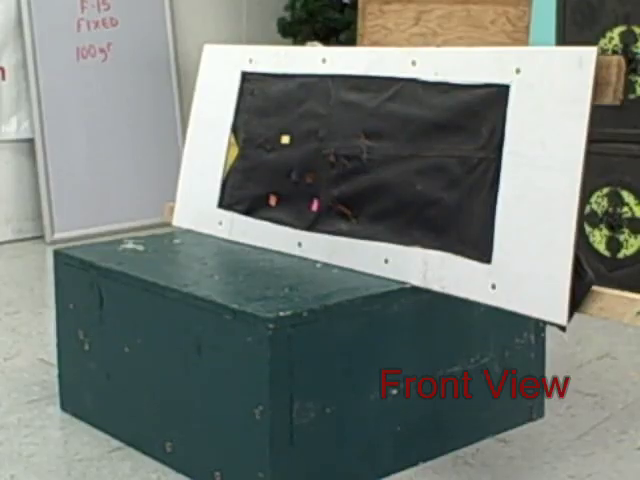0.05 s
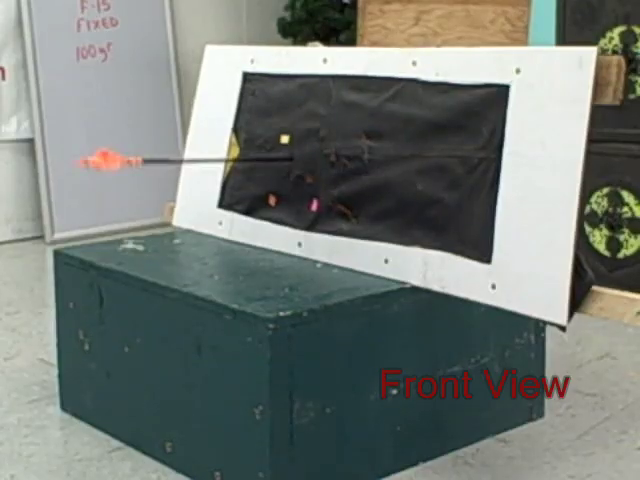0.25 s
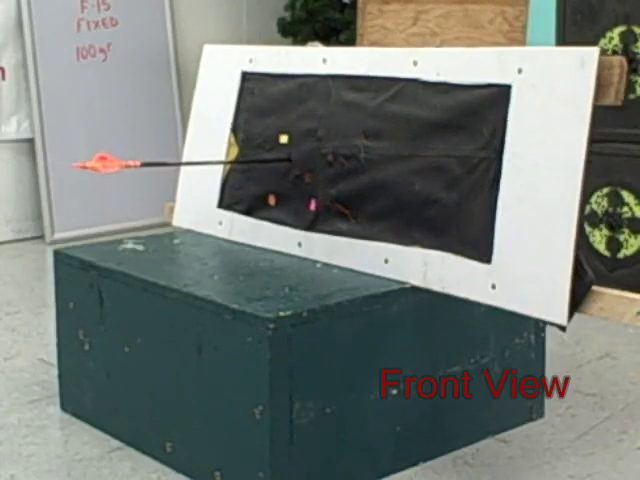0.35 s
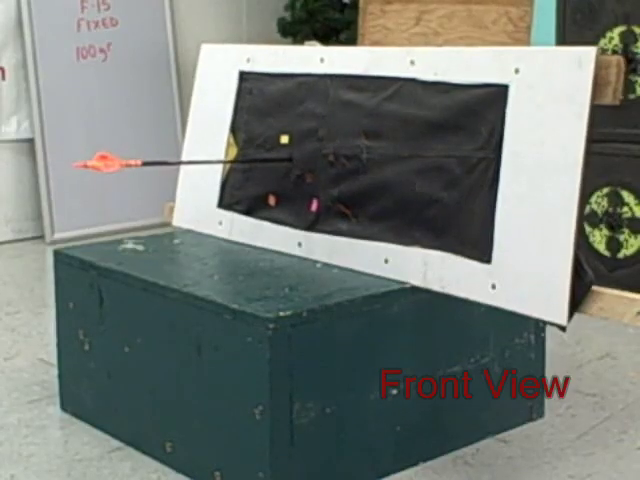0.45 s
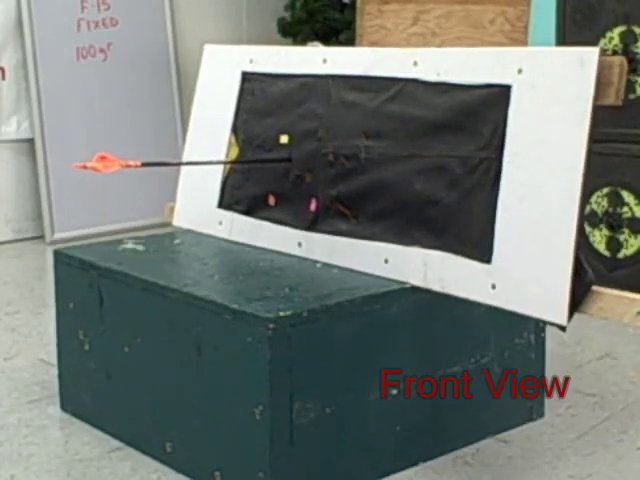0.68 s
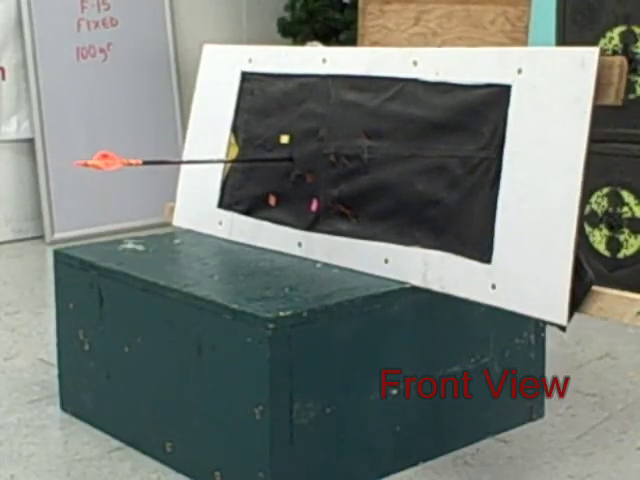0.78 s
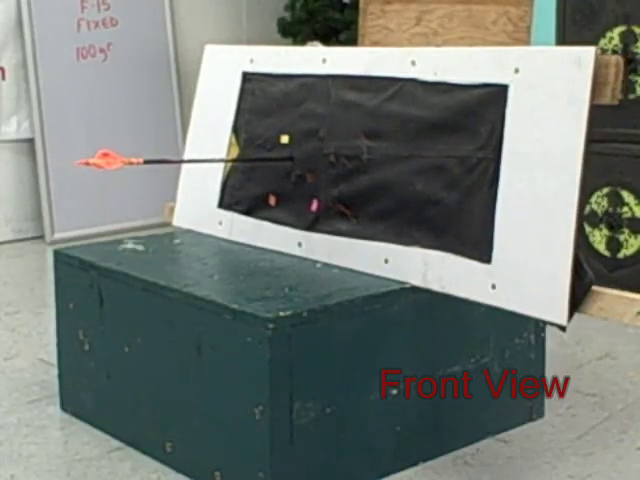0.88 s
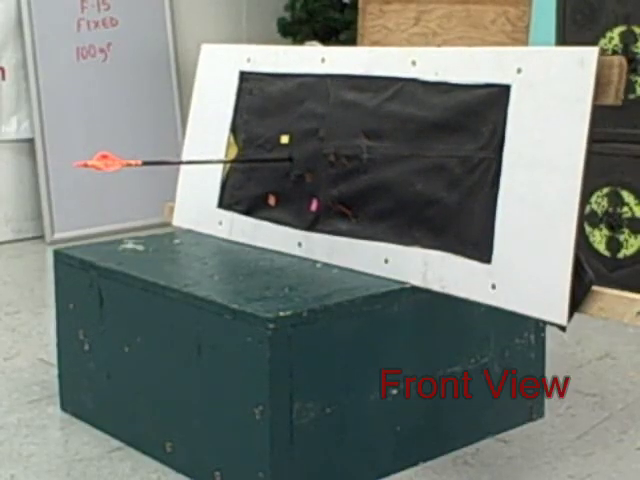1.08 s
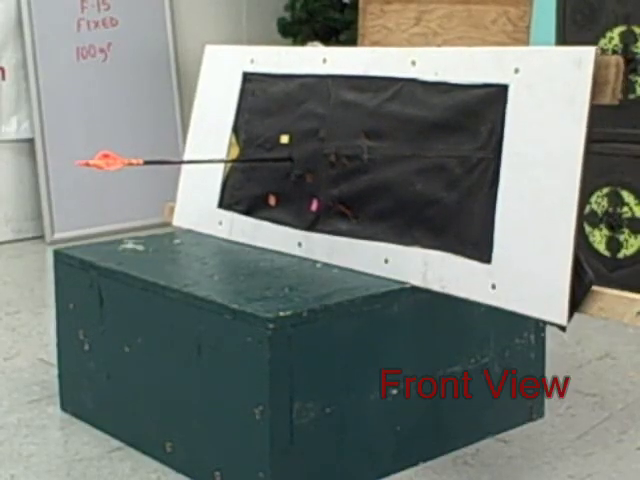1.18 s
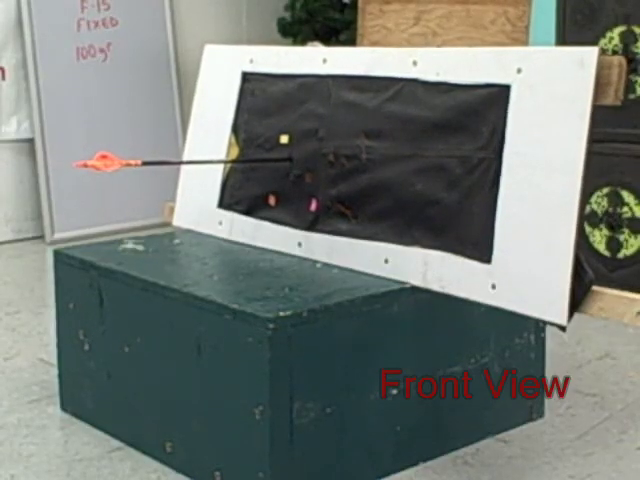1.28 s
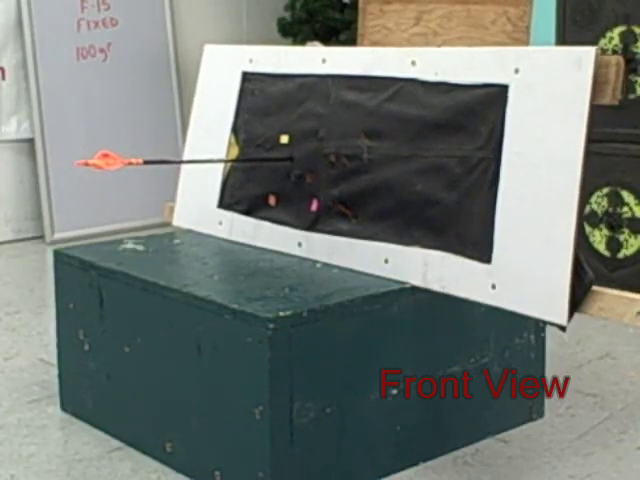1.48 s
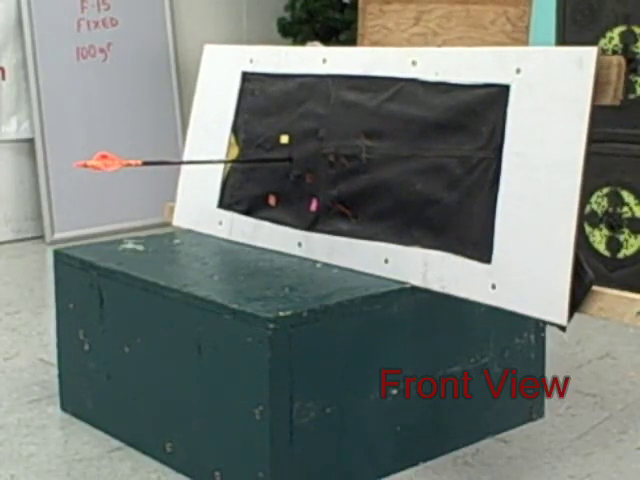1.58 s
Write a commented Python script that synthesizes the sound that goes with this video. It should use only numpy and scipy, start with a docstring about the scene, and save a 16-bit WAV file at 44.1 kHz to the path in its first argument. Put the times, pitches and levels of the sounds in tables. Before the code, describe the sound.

An arrow hisses in and slams into a wood-backed target in a large indoor shop.

```python
"""An archery lane in a large indoor shop, microphone beside the target, over a low ventilation hum.
Some 12 m away a bow is shot: the release ticks, the string snaps home, the limbs ring. The arrow's vanes
hiss louder as they near. The point cracks through the cover of a gelatin block and slams into its
wooden backing, overloading the microphone. The hall rings on, and two faint rustles follow."""
import sys
import numpy as np
from scipy import signal
from scipy.fft import rfft, irfft
from scipy.io import wavfile

SR = 44100
rng = np.random.default_rng(int(sys.argv[2]) if len(sys.argv) > 2 else 0)


def to_wav(sig):
    """Store sig (one row per channel, or 1-D mono) as 16-bit WAV at the path in sys.argv[1].

    Samples outside -1..1 are clipped; the rate is SR.
    """
    pcm = np.clip(np.atleast_2d(sig), -1, 1) * 32767
    pcm = np.round(pcm).astype(np.int16)
    wavfile.write(sys.argv[1], SR, pcm.T)  # frames by channels


N = 72765
STRING_S, HIT_S, STOP_S = .067, .2362, .2435  # the arrow leaves, meets the cover, meets the backing


def amp(db):
    """Decibels to gain."""
    return 10 ** (np.asarray(db) / 20)


def read(points, hz):
    """Reads a table on a log-frequency axis."""
    f, value = np.transpose(points)
    return np.interp(np.log(hz + 1), np.log(f + 1), value)


def clock():
    """Time of every sample in seconds."""
    return np.arange(N) / SR


def noise(colour):
    """Noise with the given density in dB per Hz."""
    hz = np.fft.rfftfreq(N, 1 / SR)
    phases = np.exp(2j * np.pi * rng.random(len(hz)))
    return irfft(phases * amp(read(colour, hz)), N) * np.sqrt(N * SR / 2)


def wander(rate_hz):
    """Slow random drift of unit strength."""
    hz = np.fft.rfftfreq(N, 1 / SR)
    drift = irfft(rfft(rng.standard_normal(N)) * np.exp(-(hz / rate_hz) ** 2), N)
    return drift / drift.std()


def fade(age, t60):
    """Exponential decay, 60 dB down after t60 seconds."""
    return np.exp(-np.log(1000) * np.maximum(age, 0) / t60)


def burst(colour, start, attack, hold, t60):
    """Noise that rises, holds and dies away; times in seconds."""
    age = clock() - start
    return noise(colour) * np.clip(age / attack, 0, 1) * fade(age - attack - hold, t60)


def ring(modes, start):
    """Damped modes set going by one blow."""
    age = np.maximum(clock() - start, 0)
    return sum(amp(db) * fade(age, t60) * np.sin(2 * np.pi * hz * age) for hz, db, t60 in modes)


def chatter(slips_per_s=350, decay_s=.0012, depth=.6):
    """Uneven strength of many small slips in quick succession."""
    slips = (rng.random(N) < slips_per_s / SR) * 1.
    spikes = signal.lfilter([1], [1, -np.exp(-1 / (decay_s * SR))], slips)
    return np.sqrt(1 - depth + depth * spikes / spikes.mean())


def low_pass(x, edge_hz):
    """Steep band limit."""
    return signal.oaconvolve(x, signal.firwin(401, edge_hz, window=("kaiser", 8), fs=SR), "same")


def ventilation(hum_hz=93.5, hum_db=-49):
    """The shop's room tone: dull air noise and a wavering fan hum."""
    # moving air (frequency [Hz], density [dB per Hz])
    air = [(20, -66), (55, -67.5), (88, -68), (110, -81), (200, -80), (420, -93), (850, -99), (1700, -106),
           (3500, -110), (12000, -112)]
    waver = 1 + .35 * (wander(rate_hz=6) + 1j * wander(rate_hz=6))
    hum = waver * np.exp(2j * np.pi * hum_hz * clock())
    return noise(air) + amp(hum_db) * np.sqrt(2) * hum.real


def hall(x, build_s=.015, swell_s=.17, spread_s=.025, swell_hz=450, swell_db=8):
    """Dense reflections, each band dying at its own speed; the far wall returns a late low-mid swell."""
    # decay of the hall (frequency [Hz], t60 [s])
    decay = [(100, .75), (250, .82), (450, .85), (900, .58), (1800, .48), (3600, .48), (6500, .38),
             (11000, .3)]
    # strength of the reflections (frequency [Hz], gain [dB])
    colour = [(80, -12.5), (200, -12), (330, -9), (520, -9.5), (750, -12.5), (1200, -15), (2000, -13.5),
              (3800, -18.5), (6500, -17.5), (12000, -12.5)]
    hz, t, bands = signal.stft(rng.standard_normal(N), SR, nperseg=512)
    t60 = read(decay, hz)[:, None]
    envelope = fade(t, t60) * np.sqrt(2 * np.log(1000) / (t60 * SR))  # equal energy for any t60
    swell = np.exp(-((t - swell_s) / spread_s) ** 2 - np.log((hz[:, None] + 1) / swell_hz) ** 2)
    gain = amp(read(colour, hz)[:, None] + swell_db * swell)
    tail = signal.istft(bands * envelope * gain, SR, nperseg=512)[1][:N]
    return signal.fftconvolve(x, tail * np.minimum(clock() / build_s, 1))[:N]


def rustles():
    """Two faint, bright, grainy scuffs after the shot."""
    # scuffs (start [s], attack [s], hold [s], t60 [s], gain [dB])
    scuffs = [(.716, .011, .005, .03, 2), (.913, .009, .003, .04, -8)]
    # their spectrum (frequency [Hz], density before gain [dB per Hz])
    colour = [(500, -102), (1700, -97.5), (3500, -100), (6500, -91), (10500, -86.5), (12500, -92)]
    return chatter() * sum(amp(db) * burst(colour, *timing) for *timing, db in scuffs)


def bow():
    """At the far end of the shop the release ticks, the string snaps home, the bow rings and buzzes."""
    # spectra of the tick, the snap and the buzz (frequency [Hz], density [dB per Hz])
    tick_colour = [(200, -98), (1200, -94), (2200, -85), (3200, -91.5), (4800, -84.5), (6500, -95.5),
                   (12000, -101)]
    snap_colour = [(60, -68), (200, -71.5), (380, -65), (850, -66), (1500, -71), (3000, -74.5),
                   (4700, -74.5), (7000, -85), (12000, -88.5)]
    buzz_colour = [(3000, -105), (4300, -83), (5000, -68), (5900, -78), (7000, -91.5), (12000, -110)]
    # modes of the limbs and string (frequency [Hz], level [dB], t60 [s])
    limbs = [(78, -37, .5), (368, -38.5, .7), (440, -43, .4), (665, -43, .45), (836, -42.5, .3),
             (1211, -45.5, .3), (1560, -48, .3)]
    tick = burst(tick_colour, start=.045, attack=.001, hold=.003, t60=.07)
    snap = burst(snap_colour, STRING_S, attack=.001, hold=.003, t60=.13)
    buzz = burst(buzz_colour, start=.116, attack=.004, hold=.01, t60=.08)
    return tick + snap + ring(limbs, STRING_S) + buzz


def flight(pass_s=.222, speed_m_per_s=75, miss_m=1.9, beam_db=10.5):
    """The vanes hiss loudest as they pass the microphone, miss_m away, and hush as the arrow stops."""
    # vane hiss (frequency [Hz], density before distance and beam [dB per Hz])
    colour = [(150, -70), (900, -71), (2000, -63), (4000, -61.5), (7000, -62), (10500, -62), (12500, -61)]
    t = clock()
    nearness = miss_m / np.hypot(miss_m, speed_m_per_s * (t - pass_s))
    beam = amp(beam_db * (nearness - 1.5))  # the hiss is thrown sideways more than ahead
    return noise(colour) * nearness * beam * (t > STRING_S) * (t < STOP_S)


def impact():
    """Close to the microphone the point cracks the cover; the shaft chatters in the ringing backing."""
    # spectra of the cover's crack and the wood's crunch (frequency [Hz], density [dB per Hz])
    crack_colour = [(100, -57), (400, -46.5), (900, -38), (2000, -43), (4000, -37.5), (5500, -46),
                    (9000, -49.5), (12500, -51.5)]
    crunch_colour = [(40, -63), (90, -43), (200, -31.5), (500, -28.5), (680, -38.5), (1000, -31),
                     (1600, -39.5), (2200, -44), (4500, -46), (8000, -52), (12500, -57)]
    # modes of the backing board and its stand (frequency [Hz], level [dB], t60 [s])
    board = [(173, -12, .35), (241, -6, .14), (298, -8.5, .15), (346, -3.5, .15), (398, -21.5, .6),
             (447, -19, .75), (540, -4, .18), (807, -24, .45), (899, -17, .3), (980, -17, .15),
             (1061, -27.5, .38), (1175, -23.5, .33), (1509, -17.5, .16), (1604, -9.5, .14)]
    crack = burst(crack_colour, HIT_S, attack=.0003, hold=.0015, t60=.02)
    crunch = burst(crunch_colour, STOP_S, attack=.001, hold=.022, t60=.12) * chatter()
    return crack + crunch + ring(board, STOP_S)


def scene():
    """What reaches the target, direct and through the hall; the distant bow is the most reverberant."""
    shot, hiss, hit, scuffs = bow(), flight(), impact(), rustles()
    reflections = hall(hit + amp(13.5) * shot + amp(4) * hiss + amp(5) * scuffs)
    return (shot + hiss + hit + scuffs + reflections + ventilation())[None]


def record(dry):
    """One microphone: its amplifier saturates, the band is limited, and peaks are cut at full scale."""
    overloaded = np.clip(dry[0], -1.05, 1.05)
    heard = low_pass(overloaded, edge_hz=12800)
    return low_pass(np.clip(heard, -1, 1), edge_hz=15600)[None]


dry = scene()
out = record(dry)
to_wav(out)
```